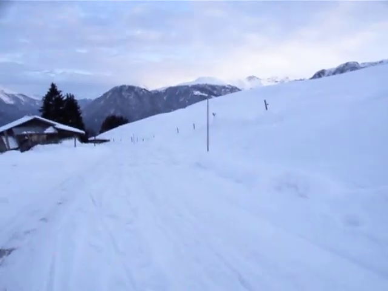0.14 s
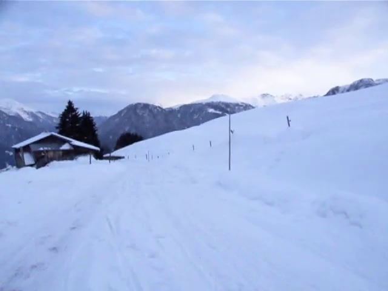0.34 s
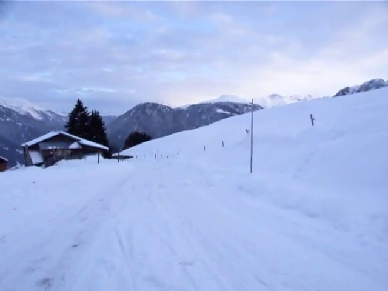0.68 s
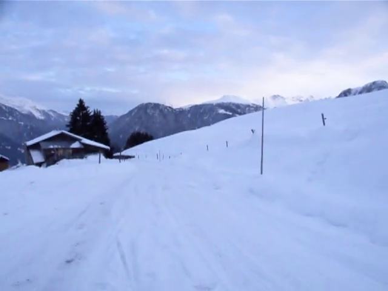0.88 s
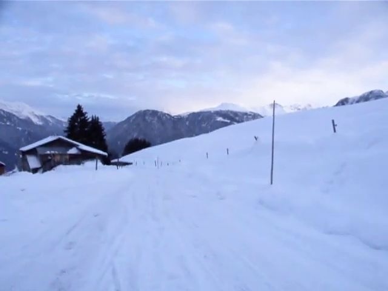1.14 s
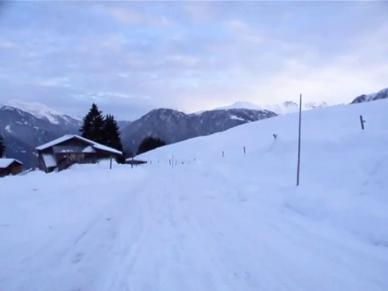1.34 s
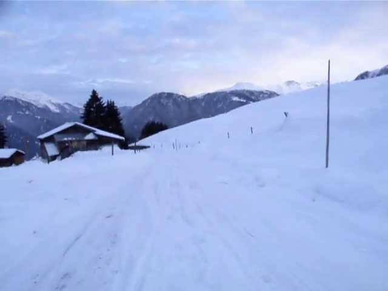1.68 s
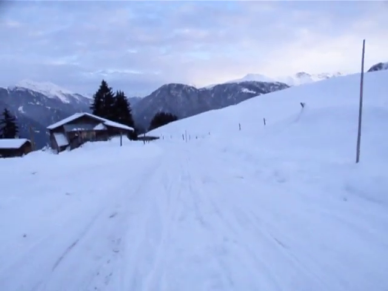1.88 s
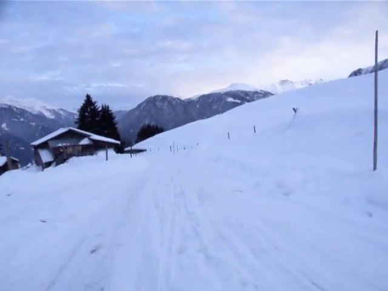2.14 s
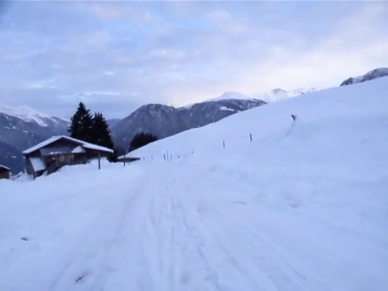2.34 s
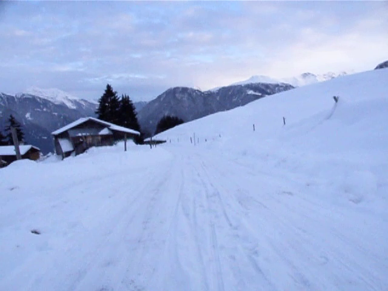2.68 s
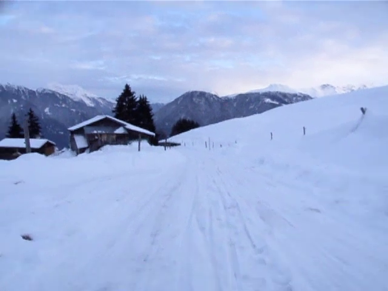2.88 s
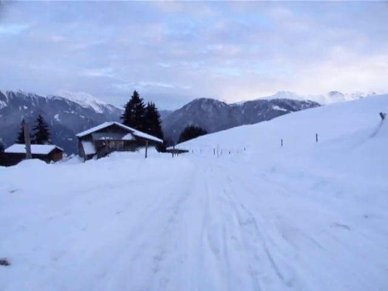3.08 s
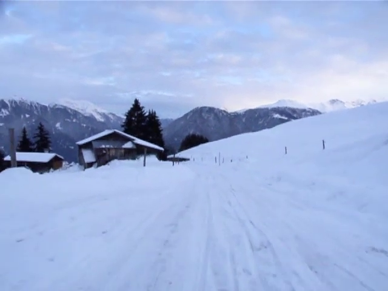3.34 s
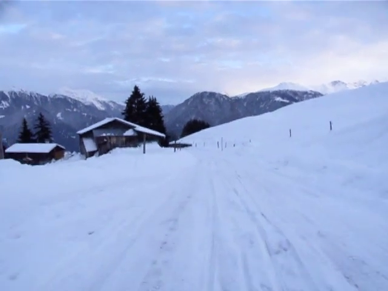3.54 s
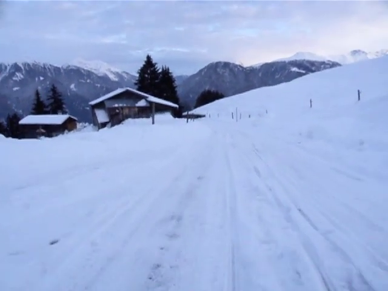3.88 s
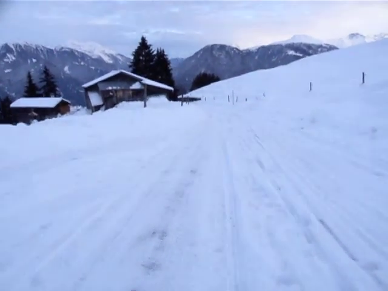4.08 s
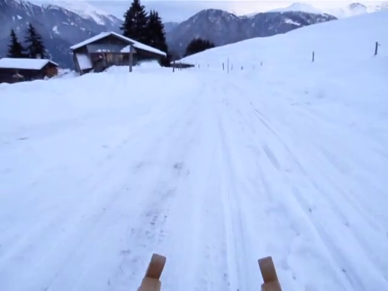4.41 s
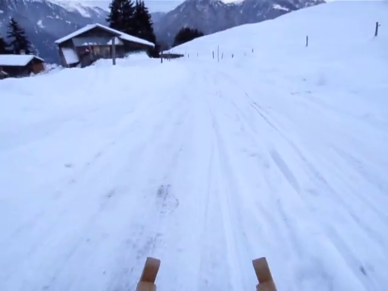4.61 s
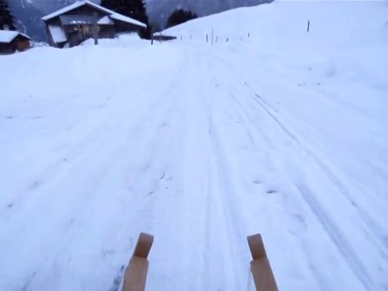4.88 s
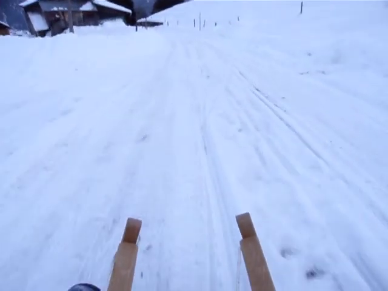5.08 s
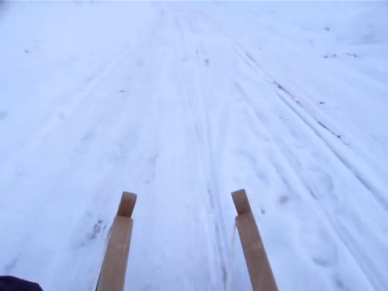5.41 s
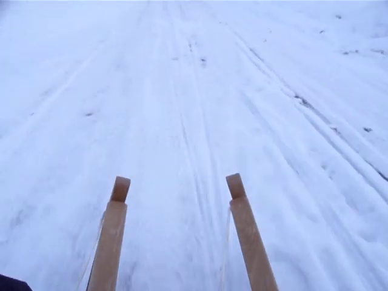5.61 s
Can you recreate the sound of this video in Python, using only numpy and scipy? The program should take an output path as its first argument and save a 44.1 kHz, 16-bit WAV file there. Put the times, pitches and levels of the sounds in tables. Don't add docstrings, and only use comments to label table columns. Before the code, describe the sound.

Close onboard sound outdoors: runners crush snow in a steady rough hiss while the wooden frame rattles underneath. Early loud knocks give way to calmer scraping, then irregular crust scuffs, woody clacks and tiny grit snaps. Later, low wind puffs batter the microphone in quick clusters, mixed with brief icy squeaks and stone cracks. There is little deep bass or high treble; loud hits distort and briefly pull the level down.

```python
import sys
import numpy as np
from scipy import signal
from scipy.fft import rfft, irfft, next_fast_len
from scipy.io import wavfile

SR = 44100
rng = np.random.default_rng(int(sys.argv[2]) if len(sys.argv) > 2 else 0)


def undo_db(level):
    steps = np.asarray(level, float) / 20
    return 10 ** steps


def to_wav(s):
    ch = np.atleast_2d(s).T
    pcm = np.round(np.clip(ch, -1, 1) * 32767)
    wavfile.write(sys.argv[1], SR, pcm.astype(np.int16))


N = 253134

# time_s, pressure_db, roughness_db
TRACK = [(0.0, -33.5, 6.5), (.43, -31.5, 4.5), (.72, -25.5, -3.5), (.95, -30.5, -4.5), (1.2, -32.5, -1.5),
         (1.49, -31.5, -0.5), (1.61, -29.5, -3.5), (1.95, -30.5, 0.5), (2.4, -31.5, 2.5), (2.88, -32, 2),
         (3.32, -33.5, 4), (3.6, -35.5, 3), (3.95, -32, -0.5), (4.15, -29.5, 1), (4.6, -32.5, -4.5),
         (4.9, -30.5, -3.5), (5.3, -31.5, 0), (5.74, -28, -2.5)]
# pitch_hz, level_db (per Hz)
HISS_COLOUR = [(170, -43.5), (260, -17.5), (360, -8), (820, -8.5), (1010, -5.5), (1340, -11), (1930, -11),
               (2960, -9.5), (3800, -12.5), (5400, -16)]
# pitch_hz, width_hz, level_db
FRAME_MODES = [(290, 67, -13), (384, 150, -5), (545.6, 117, 1.5), (740, 290, -5.5), (922, 51, 1.5),
               (1062, 125, 2.5), (1223, 110, -2), (1542, 160, -3), (2200, 200, -6), (2660, 440, -11.5),
               (2942, 26, -11.5)]
# time_s, level_db (of the deep roll)
AIRFLOW = [(0.0, -56.5), (.25, -61.5), (1.2, -62), (1.5, -56.5), (1.65, -40), (1.8, -48), (2.0, -41),
           (2.28, -44.5), (2.5, -62.5), (3.08, -60), (3.2, -46), (3.5, -42.5), (3.7, -30.5), (4.3, -39.5),
           (4.5, -31.5), (5.25, -32), (5.42, -48), (5.74, -49.5)]
# start_s, length_s, gain_db
WIND_BLASTS = [(0.0, .25, 11.5), (.27, .45, 6.5), (1.26, 0.05, 4.5), (1.37, 0.047, 11.5), (1.587, .09, 2.5),
               (1.8, 0.048, 6), (1.978, 0.18, 6), (2.558, 0.076, 11.5), (2.861, 0.24, 10), (3.12, 0.13, 7),
               (3.771, .25, 8.5), (3.95, 0.062, 6), (4.162, .06, 0.5), (4.014, 0.23, 12.5),
               (4.282, 0.099, 8), (4.412, 0.12, 5), (4.57, 0.185, 7.5), (4.819, 0.13, 5),
               (4.984, 0.21, 11.5), (5.31, 0.11, 8), (5.45, 0.21, 6.5)]
# pitch_hz, level_db (per Hz)
BUFFET_COLOUR = [(71, -45.5), (120, -16), (156, 0), (330, 5), (585, -10.5), (664, -19.5), (900, -19),
                 (1170, -42), (1980, -120)]
# pitch_hz, level_db (per Hz)
ROLL_COLOUR = [(22, -30), (45, -19), (80, -12.5), (120, -8.5), (170, -9.5), (260, -28.5)]
# start_s, level_db, length_s, pitch_hz
CRUST_SCUFFS = [(0.125, 6, 0.055, 550), (0.158, -5.5, 0.054, 600), (0.207, -7.5, 0.013, 2450),
                (0.288, 0, .01, 600), (0.534, -2.5, .044, 1110), (1.413, -4, 0.013, 1240),
                (1.782, -3, .02, 1930), (1.785, -6, 0.11, 1020), (1.924, -7.5, 0.026, 900),
                (2.049, 1.5, 0.066, 746), (2.127, -6.5, 0.051, 1000), (2.469, -5, 0.061, 1000),
                (2.585, -3, 0.041, 1500), (2.897, 0.5, 0.028, 800), (2.947, -8, 0.023, 700),
                (3.067, 0, 0.02, 650), (3.093, -7, 0.0063, 500), (4.042, -9.5, 0.025, 890),
                (4.214, -4, 0.017, 950), (4.295, 0, .033, 830), (4.453, -8.5, 0.011, 2640),
                (4.574, -4.5, .037, 935), (4.662, -11.5, 0.037, 2480), (4.811, -4.5, 0.054, 767),
                (4.909, -2.5, 0.13, 910), (5.097, -4.5, 0.046, 1000), (5.239, -7, 0.02, 605),
                (5.329, 2, 0.0082, 493), (5.33, 2, 0.025, 1070), (5.385, -9.5, 0.004, 2200)]
# peak_s, level_db, pitch_hz, decay_s (to -60 dB)
FRAME_KNOCKS = [(0.1425, -41.5, 985, .02), (0.145, -3.5, 990, 0.023), (.1922, 3.4, 540, .007),
                (1.285, -15.5, 1200, 0.022), (1.3865, -19.5, 620, 0.011), (1.4452, -19.5, 380, 0.077),
                (1.8284, -16, 920, 0.034), (1.8495, -6.5, 593, 0.0028), (1.9415, -21, 790, 0.0088),
                (1.976, -6, 975, 0.009), (2.3274, -5, 1064, 0.037), (2.5913, -13, 1020, 0.065),
                (2.9053, -10.5, 1090, .023), (2.927, -6.5, 1203, 0.026), (2.9312, -5.5, 398, 0.011),
                (2.984, -16, 1000, 0.056), (3.0334, -16.5, 455, 0.011), (3.0662, -2, 450, .018),
                (3.0664, -8, 900, .012), (3.1064, -10, 410, 0.021), (3.5705, -25, 1046, .03),
                (3.7905, -12.5, 275, 0.026), (4.466, -8.5, 1064, 0.016), (4.5071, -10, 315, 0.045),
                (4.5908, -12, 290, 0.013), (4.6795, -8.5, 322, 0.021), (4.9161, -7, 1016, .02),
                (4.9245, -6.5, 1120, 0.011), (5.244, -13.5, 600, .026)]
# peak_s, level_db, lowest_pitch_hz, decay_s (to -60 dB)
GRIT_TICKS = [(.1915, -12, 1900, .008), (2.589, -12, 1800, .01), (2.9305, -12, 2000, .008),
              (3.0655, -14, 1800, .008), (4.508, -16, 1900, .01), (.2155, -15, 2200, .025),
              (.40, -17, 2050, .02), (1.791, -13, 1600, .02), (1.795, -13, 2200, .015),
              (4.6253, -11, 1900, .008), (1.3845, -16, 900, .008), (3.5719, -17, 800, .01),
              (5.0582, -17, 600, .008), (4.2305, -14, 1940, .012)]
# start_s, length_s, level_db, pitch_hz
EDGE_SINGS = [
    (0.723, 0.14, -33, 2960),
    (4.467, 0.033, -31.5, 3060),
    (4.819, .05, -25.5, 2990),
    (4.93, 0.035, -29, 3100),
    (5.098, 0.045, -35.5, 2900),
]
# middle_s, depth_db, length_s
SLIDING_DIPS = [(1.363, 1, .03), (1.702, 3.5, 0.11), (2.364, 2.5, 0.095), (3.618, 3, .05),
                (1.525, 4.5, 0.034), (1.874, 13, 0.0093), (2.695, 4, 0.044), (3.137, 3, 0.043),
                (3.531, 5.5, 0.037), (3.983, 5, 0.089), (4.25, 6.5, 0.032), (4.567, 6.5, 0.012),
                (4.699, 5, 0.02), (5.067, 4.5, 0.077), (5.202, 0, 0.02), (5.377, 4.5, 0.018)]
# peak_s, level_db, pitch_hz
WIND_POPS = [(1.592, -22.5, 210), (1.628, -19.5, 196), (1.666, -17, 200), (2.086, -25, 300),
             (2.109, -20, 240), (4.3072, -5, 560), (4.443, -15, 260), (4.457, -14, 280), (4.492, -11, 280),
             (4.511, -12, 300), (4.552, -10.5, 260), (4.615, -13.5, 300), (4.631, -11.5, 280),
             (4.642, -16, 280), (4.06, -6, 280), (4.17, -15, 260), (4.2, -14, 280), (5.162, -11, 260),
             (4.7264, -14, 300), (4.7436, -18, 300), (5.012, -20, 350), (5.023, -9.5, 280),
             (5.0269, -14, 260), (5.0583, -8.5, 397), (5.0697, -8.5, 330)]
# peak_s, level_db, pitch_hz, decay_s (to -60 dB)
STONE_CRACKS = [
    (4.2301, -5, 3480, .011),
    (4.2306, -9, 2800, .007),
    (4.2311, -6.5, 1940, .010),
    (4.9924, -7.5, 2650, .004),
]
# pitch_hz, level_db
BAND_EDGE_CURVE = [(3800, 0), (4000, -9), (4200, -10.5), (4400, -23.5), (4600, -48), (4800, -62),
                   (5100, -72)]


def rms_one(x):
    return x / np.sqrt(np.mean(x ** 2) + 1e-20)


def in_time(rows):
    s, *columns = np.transpose(rows)
    return [np.interp(np.arange(N) / SR, s, column) for column in columns]


def high_pass(x, hz, order=2):
    return signal.sosfilt(signal.butter(order, hz, "high", fs=SR, output="sos"), x)


def drift(rate_hz):
    r = np.exp(-80 * np.pi * rate_hz / SR)
    noise = rng.standard_normal(N // 40 + 2002)
    slow = signal.lfilter([1], [1, -2 * r, r * r], noise)[2000:]
    return np.interp(np.arange(N) / 40, np.arange(len(slow)), rms_one(slow))


def resonate(x, hz, width_hz):
    r = np.exp(-np.pi * width_hz / SR)
    feedback = [1, -2 * r * np.cos(2 * np.pi * hz / SR), r * r]
    return signal.lfilter(np.array([1, 0, -1]) * (1 - r * r) / 2, feedback, x)


def banded_noise(colour, shared_db, patchy_db, patch_rate):
    hz, level_db = np.transpose(colour)
    edges = hz[0] * 2 ** np.arange(0, np.log2(hz[-1] / hz[0]) + 1 / 3, 1 / 3)
    white = rng.standard_normal((2, N))
    out = 0
    for k, (low, high) in enumerate(zip(edges, edges[1:])):
        band = signal.sosfilt(signal.butter(2, [low, high], "band", fs=SR, output="sos"), white[k % 2])
        centre_db = np.interp(np.log(low * high) / 2, np.log(hz), level_db)
        out = out + band * undo_db(centre_db + shared_db + patchy_db * drift(patch_rate))
    return rms_one(out)


def grains(per_s, spread_db):
    sizes = undo_db(spread_db * np.minimum(rng.exponential(1, N), 4))
    signs = rng.choice([-1, 1], N)
    return sizes * signs * (rng.random(N) < per_s / SR) + 1e-18


def ringing_grains(clicks, pitches_hz, width_share):
    dealt = rng.integers(0, len(pitches_hz), N)
    out = np.zeros(N)
    for k, hz in enumerate(pitches_hz):
        out += resonate(clicks * (dealt == k) + 1e-18, hz, width_share * hz)
    return out


def ring(hz, decay_s, rise_s):
    t = np.arange(SR // 10) / SR
    swell_and_fade = (1 - np.exp(-t / rise_s)) * undo_db(-60 * t / max(decay_s, .004))
    wave = np.sin(2 * np.pi * hz * t) * swell_and_fade
    return wave / np.abs(wave).max()


def add(track, s, wave):
    at = round(s * SR) - np.argmax(np.abs(wave))
    track[at:at + len(wave)] += wave[:N - at]


def runners(press_db, bumps):
    hiss = banded_noise(HISS_COLOUR, 2.0 * bumps, patchy_db=0.0, patch_rate=33)
    crystals = grains(600 * undo_db(9.1 * bumps), spread_db=5.6)
    crush = ringing_grains(crystals, np.geomspace(1300, 4100, 10), 1 / 16)
    return undo_db(press_db + 2.0) * (hiss + undo_db(-9.5) * rms_one(crush))


def frame(press_db, rough_db, bumps):
    jolts = grains(1500 * undo_db(2.0 * bumps), spread_db=2.7)
    shaken = np.zeros(N)
    for k, (hz, width_hz, level_db) in enumerate(FRAME_MODES):
        strength = undo_db(level_db + 2.5 * drift(19))
        shaken += (-1) ** k * strength * resonate(jolts, hz, width_hz)
    return undo_db(press_db + rough_db + 1.5) * rms_one(shaken)


def blasts():
    t, edge_s = np.arange(N) / SR, 0.0044
    out = np.zeros(N)
    for s, length_s, gain_db in WIND_BLASTS:
        out += gain_db / 2 * (np.tanh((t - s) / edge_s) - np.tanh((t - s - length_s) / edge_s))
    return out


def wind(gust_db, held):
    wind_db = -40.4 + 0.36 * (gust_db - gust_db.mean()) + blasts()
    buffets_db = 2.4 * drift(28) + .8 * drift(7)
    near = banded_noise(BUFFET_COLOUR, buffets_db, patchy_db=2.5, patch_rate=100)
    eddies, dealt = grains(140, spread_db=2.5), rng.integers(0, 3, N)
    loose = np.zeros(N)
    for k, hz in enumerate((210, 280, 370)):
        puff = resonate(eddies * (dealt == k) + 1e-18, hz, 0.81 * hz)
        loose += resonate(puff, hz, 0.81 * hz)
    near = high_pass(held * undo_db(wind_db) * (near + undo_db(-5.0) * rms_one(loose)), 150, order=4)
    roll = banded_noise(ROLL_COLOUR, 0.6 * buffets_db, patchy_db=2.0, patch_rate=2.5)
    return near + undo_db(gust_db + 2.0) * roll


def scuffs():
    out, coarse = np.zeros(N), rms_one(grains(2200, spread_db=2.54))
    for s, level_db, length_s, hz in CRUST_SCUFFS:
        at, size = round(s * SR), round(max(length_s, .008) * SR)
        burst = coarse[at:at + size] * signal.windows.tukey(size, .5)
        burst = np.pad(burst, (0, 600))
        near_mode = np.exp(-(np.log(hz / 1060) / 0.5) ** 2)
        crust = resonate(burst, hz, 0.32 * hz) + 0.18 * burst
        wood = 0.31 * near_mode * resonate(burst, 1200, 150)
        out[at:at + size + 600] += undo_db(level_db - 7.5) * (crust + wood)
    return out


def knocks():
    out = np.zeros(N)
    tick_fade = np.exp(-np.arange(400) / SR / 0.00071)
    for s, peak_db, hz, decay_s in FRAME_KNOCKS:
        upper = ring(1.7 * hz, .6 * decay_s, .0003) + .6 * ring(2.8 * hz, .45 * decay_s, .0004)
        upper_db = -5 - 3.5 * np.log2(hz / 500)
        add(out, s, undo_db(peak_db - 2.5) * (ring(hz, decay_s, .0005) + undo_db(upper_db) * upper))
        tick = signal.lfilter([1, -.8], [1], rng.standard_normal(400)) * tick_fade
        add(out, s - .0008, undo_db(peak_db - 14) * tick)
    return out


def ticks():
    out = np.zeros(N)
    for s, peak_db, hz, decay_s in GRIT_TICKS:
        snap = 0
        for step, share in ((1, 1), (1.2, -.55), (1.4, .7), (1.6, -.7), (1.82, .85)):
            snap = snap + share * ring(min(step * hz, 3700), decay_s, .0006)
        add(out, s, undo_db(peak_db) * snap / np.abs(snap).max())
    return out


def sings():
    t, rub = np.arange(N) / SR, rng.standard_normal(N)
    out = np.zeros(N)
    for s, length_s, level_db, hz in EDGE_SINGS:
        swell = np.exp(-(2 * (t - s) / length_s - 1) ** 4)
        out += undo_db(level_db) * swell * rms_one(resonate(rub, hz, width_hz=200))
    return out


def grip():
    t = np.arange(N) / SR
    dip_db = np.zeros(N)
    for s, depth_db, length_s in SLIDING_DIPS:
        dip_db += depth_db * np.exp(-(2 * (t - s) / length_s) ** 4)
    return undo_db(-dip_db)


def pops():
    out = np.zeros(N)
    for s, peak_db, hz in WIND_POPS:
        add(out, s, undo_db(peak_db) * ring(hz, 2.6 / hz, 0.2 / hz))
    return out


def cracks():
    out = np.zeros(N)
    for s, peak_db, hz, decay_s in STONE_CRACKS:
        add(out, s, undo_db(peak_db) * ring(hz, decay_s, .15 * decay_s))
    return out


def scene():
    press_db, rough_db = in_time(TRACK)
    gust_db, = in_time(AIRFLOW)
    bumps = 0.64 * drift(7.1) + 0.67 * drift(28)
    held = grip()
    sliding = held * (runners(press_db, bumps) + frame(press_db, rough_db, bumps))
    sledge = sliding + scuffs() + knocks() + ticks() + sings() + cracks()
    return (high_pass(sledge, 213) + wind(gust_db, held) + pops())[None]


def roll_off(x):
    return signal.sosfilt(signal.butter(12, 16500, fs=SR, output="sos"), x)


def record(dry):
    x = high_pass(dry, 124)
    over_db = np.maximum(20 * np.log10(np.abs(x) + 1e-9) + 5, 0)
    slope_db = 178 * np.arange(N) / SR
    held_db = np.maximum.accumulate(over_db + slope_db, axis=1) - slope_db
    lag = np.exp(-1 / (0.0037 * SR))
    x = x * undo_db(-0.34 * signal.lfilter([1 - lag], [1, -lag], held_db))
    x = x + undo_db(-45) * signal.lfilter([.1], [1, -.9], rng.standard_normal(N))
    size = next_fast_len(N + 2048)
    hz = np.arange(size // 2 + 1) * SR / size
    band_db = np.interp(hz, *np.transpose(BAND_EDGE_CURVE))
    x = irfft(rfft(x, size) * undo_db(band_db), size)[:, :N]
    mix = np.clip(x, -.715, .715) - .0027
    return roll_off(mix)


dry = scene()
out = record(dry)
to_wav(out)
```